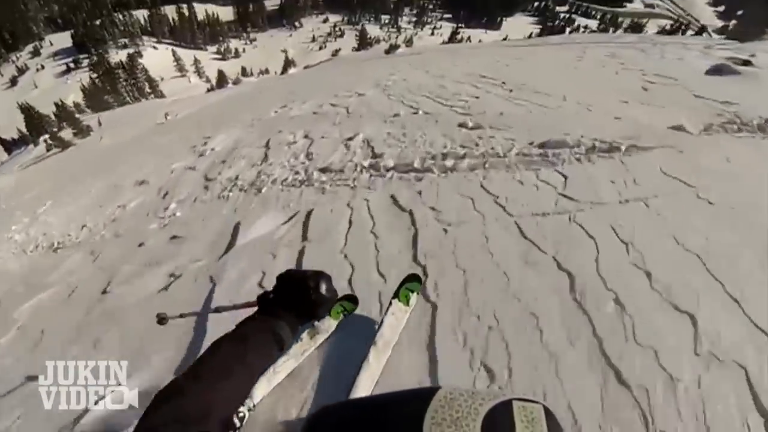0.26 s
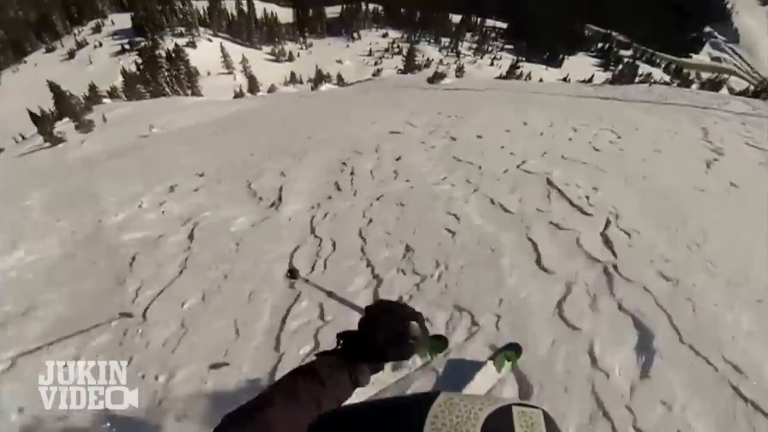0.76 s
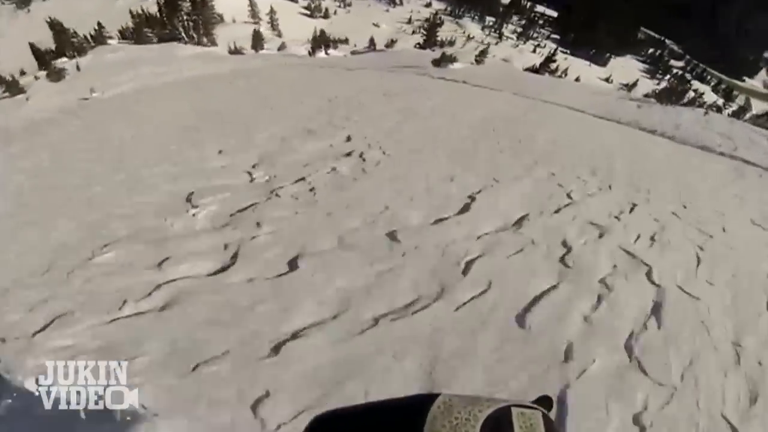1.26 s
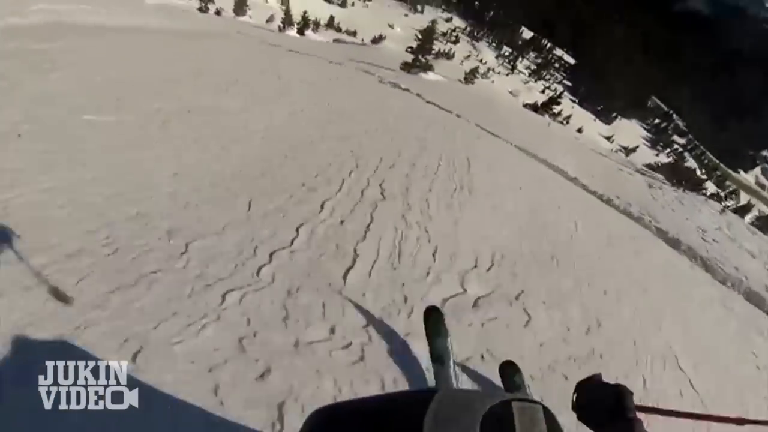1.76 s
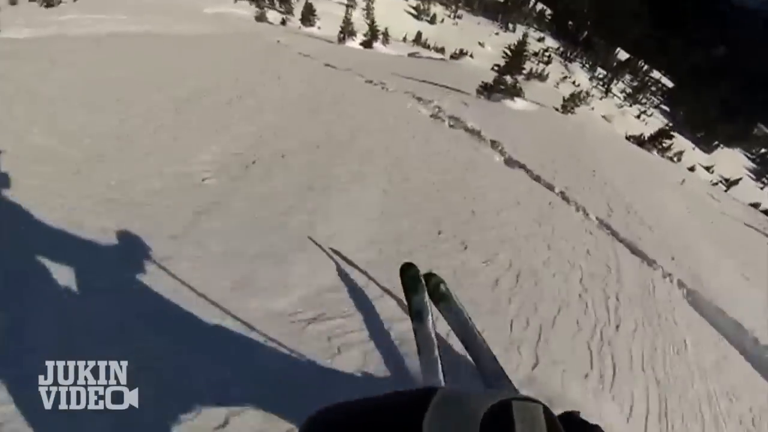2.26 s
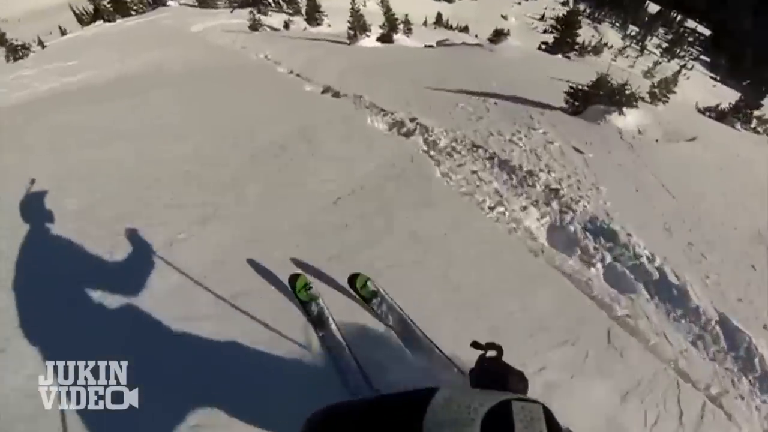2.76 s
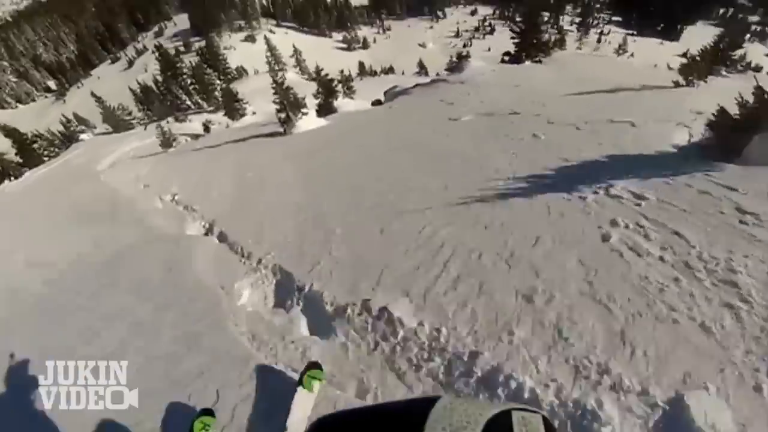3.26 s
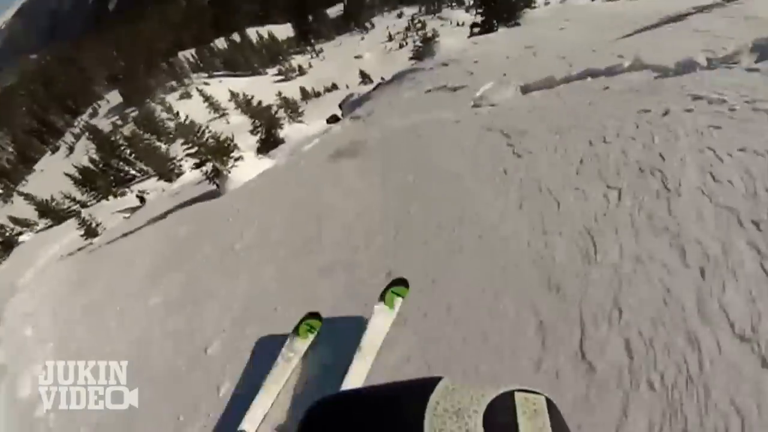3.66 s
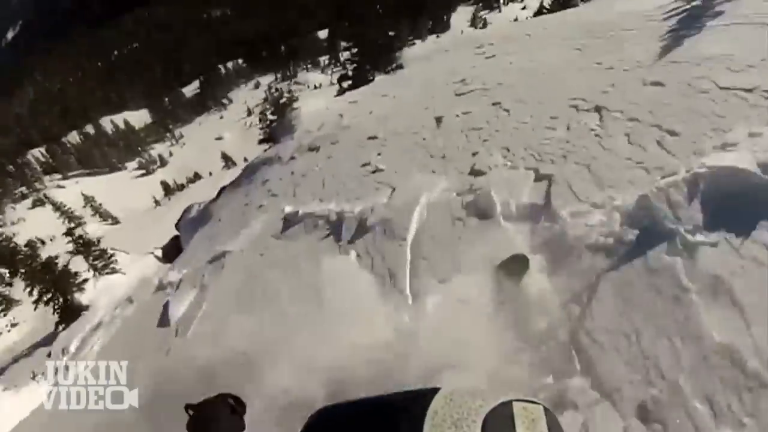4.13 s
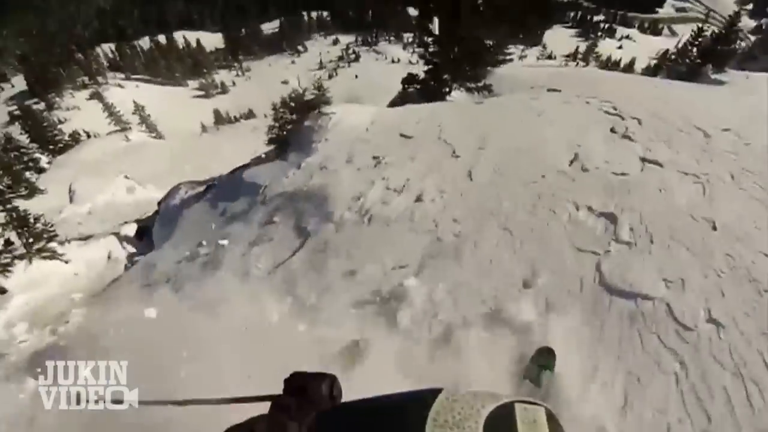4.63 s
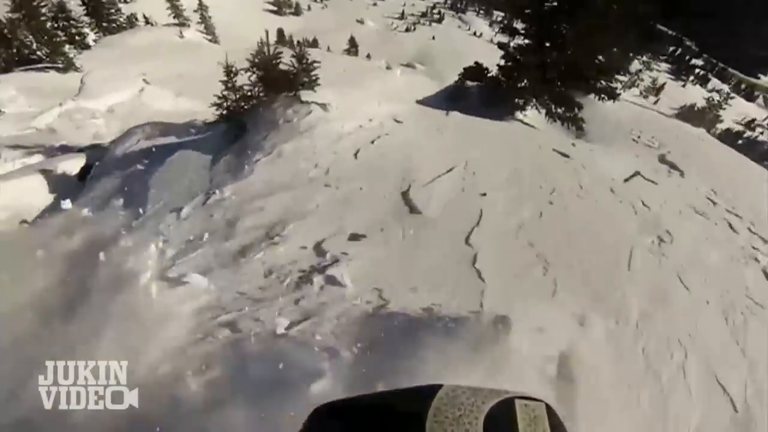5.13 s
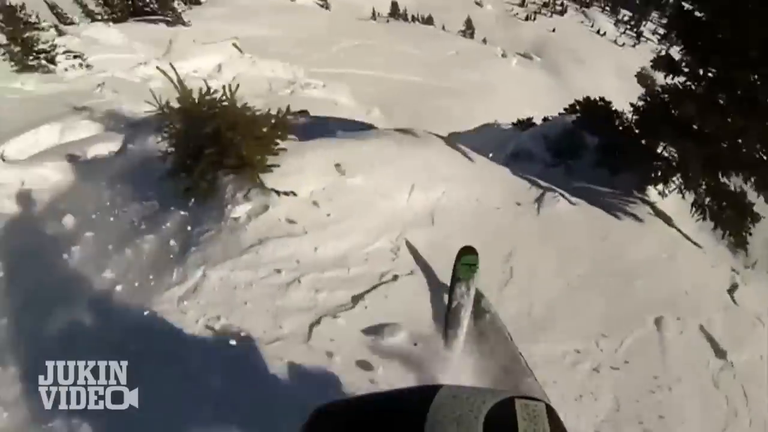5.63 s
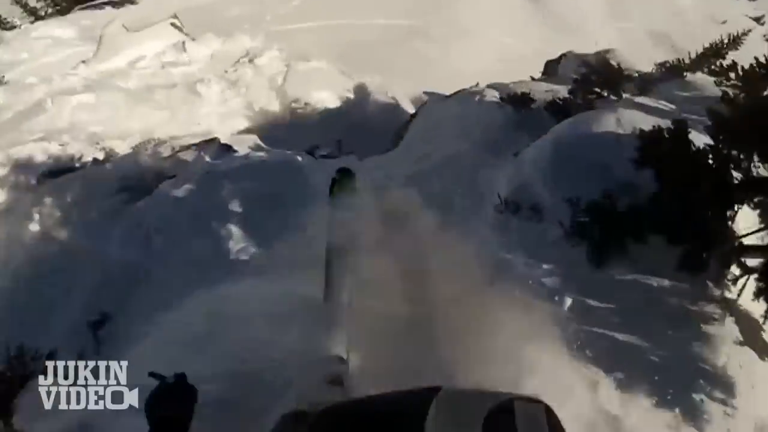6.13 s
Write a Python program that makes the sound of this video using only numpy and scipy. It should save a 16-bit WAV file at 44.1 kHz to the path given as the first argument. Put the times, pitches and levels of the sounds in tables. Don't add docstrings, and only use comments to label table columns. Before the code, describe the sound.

From 0 to 0.9 s, deep fluttering wind rumble and a muffled, grainy ski hiss fill a closed plastic helmet-camera case on an open slope. A soft jolt at 0.9 s leads into a lighter, quieter glide. At 2.2 s a bump and small dry knock briefly dip the level; then the rumble sinks into a lull from about 2.7 s. At 3.35 s the slab gives way: huge low thumps and case slaps, heaviest around 3.45 and 3.6 s, overload the microphone, with tiny ticks and pumping level. Lumps knock the shell, a hard double clack at 3.86 s and the sharpest crack at 4.34 s. From 4.5 s the hiss is thin and the rumble softer. A brittle rattle comes at 4.95 s, a duller, crumbling one at 5.6 s, with bumps near 5.75 and 6.0 s, then faint rumble until 6.4 s.

```python
import sys
import numpy as np
from scipy import signal
from scipy.io import wavfile
from scipy.ndimage import uniform_filter1d

SR = 44100
rng = np.random.default_rng(int(sys.argv[2]) if len(sys.argv) > 2 else 0)


def materialize(psi):
    bounded = np.clip(np.atleast_2d(psi).T, -1, 1)
    quanta = np.round(bounded * 32767).astype(np.int16)
    wavfile.write(sys.argv[1], SR, quanta)


def invert_db(level):
    return 10 ** (np.asarray(level, dtype=float) / 20)


N = 281799

# (time [s], level [dB])
SHAKE = [
    (0.0, 0.5),
    (0.9, -6.5),
    (2.0, -1),
    (2.7, -8.5),
    (3.3, -0.5),
    (3.6, 8),
    (4.3, 1.5),
    (4.5, -5),
    (5.5, -12),
    (6.39, -14.5),
]
FULL_SWING = [0, .937, 2.21, 3.354, 3.454, 3.603, 3.746, 3.80, 3.935, 4.13, 4.258, 4.318, 4.41, 4.972, 5.52,
              5.64, 5.715, 5.765, 6.012, 6.056, 6.39]
# (time [s], level [dB], dying time [s])
GUSTS = [(0.09, -12, 0.034), (0.311, -14, 0.061), (.66, -16.5, 0.12), (.84, -16, 0.29), (1.2, -24, 0.07),
         (1.503, -18.5, 0.77), (1.93, -12.5, 0.025), (2.26, -14.5, 0.14), (2.519, -16, 0.14),
         (2.8, -17, 0.27), (3.1, -26, 0.36), (3.349, -14.5, 0.031), (3.463, 0.5, 0.083), (3.62, -3, 0.17),
         (3.77, -12, 0.032), (3.97, -10.5, 0.15), (4.2, -9.5, 0.21), (4.399, -8, 0.14), (4.57, -37, 0.051),
         (4.808, -22.5, 0.14), (4.977, -15.5, 0.015), (5.101, -18, 0.14), (5.354, -21, 0.21),
         (5.525, -16, 0.039), (5.683, -10.5, 0.12), (5.77, -28, 0.15), (6.049, -15.5, 0.12),
         (6.38, -16, 0.026)]
# (time [s], level [dB], dying time [s])
EDDIES = [(.0, -29.5, 0.031), (0.111, -19.5, 0.013), (.3, -25.5, 0.11), (.44, -30, 0.025), (.56, -29, 0.25),
          (.9, -33, 0.35), (1.29, -36.5, 0.083), (1.49, -38, 0.33), (1.74, -28.5, 0.22), (2.06, -36, 0.031),
          (2.21, -25, 0.053), (2.49, -31.5, 0.093), (2.78, -37.5, 0.083), (3.45, -25, 0.026),
          (3.53, -20.5, 0.1), (3.6, -19.5, 0.13), (3.73, -23.5, 0.023), (3.88, -37, 0.072),
          (4.112, -24, 0.034), (4.34, -16, 0.034), (5.299, -39, 0.088), (5.48, -40.5, 0.029),
          (5.77, -29, 0.085), (5.93, -42, 0.087), (6.18, -39, 0.031), (6.32, -36, 0.049)]
# (frequency [Hz], density [dB per Hz])
BUFFET = [(7, -19), (12, -7), (30, -37.5), (40, -6.5), (50, -12.5), (75, -19), (110, -20.5), (190, -51)]
# (time [s], hiss level [dB])
GLIDE = [(0.0, -36.5), (0.3, -34), (0.9, -37.5), (1.02, -40.5), (1.3, -43), (1.89, -38.5), (2.19, -42.5),
         (2.45, -43.5), (2.87, -41), (3.2, -45.5), (3.42, -39.5), (3.83, -42.5), (4.18, -42), (4.32, -53.5),
         (4.73, -50.5), (5.36, -58), (5.7, -55.5), (6.39, -51)]
# (frequency [Hz], density [dB per Hz])
HISS = [(190, -26), (240, -45), (360, -5), (620, 9.5), (870, -15), (1130, 9), (1450, 9), (2200, 12.5),
        (2750, 0.5), (3600, -5), (5000, -9), (7500, -19.5), (11000, -29.5), (15600, -83)]
# (frequency [Hz], width [Hz], level re hiss [dB])
CASE_PEAKS = [(282, 30, -4), (446, 24, -11), (691, 26, -15), (830, 150, -10), (1390, 170, -1),
              (3250, 120, -18), (4320, 90, -20)]
# (time [s], level [dB], length [ms], direction [sign])
SLAPS = [(2.2, -33, 4.9, -1), (3.4, -13, 37, -1), (3.4393, -10, 3.2, 1), (3.447, 8, 23, 1),
         (3.583, -25, 7.3, -1), (3.7291, -11, 4.7, 1), (3.744, -11, 5.1, 1), (4.109, -24, 4, -1),
         (5.724, -23, 4.8, 1), (5.747, -24, 5.6, -1), (5.995, -31, 6, -1)]
# (time [s], push [dB], rise [ms], hum kick [dB], buffeting [dB])
JOLTS = [(0.929, -10.5, 18, -51, -18), (2.202, -11, 3.4, -33.5, -41), (3.343, -15, 39, -30, -22),
         (3.4438, -8.5, 5.8, -37, -37), (3.588, -1, 11, -13, -5), (3.738, -18, 14, -54, -14.5),
         (3.786, -9, 33, -52, -51), (3.8677, -25, 2.7, -13.5, -21), (4.109, -39, 6.8, -25.5, -24),
         (4.3442, -7, 3, -9, -20), (4.954, -23.5, 14, -36.5, -50), (5.623, -10, 35, -54.5, -34),
         (5.747, -15.5, 15, -19, -19.5), (5.997, -19, 6.6, -26.5, -43), (6.042, -8.5, 22, -41, -22)]
# (time [s], peak [dB], rattle [ms], contact sharpness [Hz], body [dB per octave down])
KNOCKS = [(2.201, -26, 6.9, 4200, -8), (3.440, -30, 3.4, 2550, 14), (3.584, -27, 6.6, 1970, 0),
          (3.731, -24.5, 6.2, 1810, 5), (3.8625, -5, 3.7, 2860, 8.5), (4.113, -31, 4.5, 3000, 6.5),
          (4.296, -32.5, 7.8, 1430, 9), (4.313, -19.5, 5.4, 2450, -22), (4.3359, 9, 0.77, 8060, -7),
          (4.578, -30, 4.9, 3040, -7), (4.682, -37.5, 2, 2500, -4), (4.9493, -17.5, 6.3, 4300, 1),
          (5.6, -16, 16, 3200, -45), (5.746, -42.5, 2.3, 3100, 10), (5.847, -24.5, 4.1, 2890, -8),
          (6.386, -51, 3.7, 8900, 1)]
# (near 0.8 kHz [dB], 1.3 kHz [dB], 1.8 and 2.3 kHz [dB],
# near 3 kHz [dB], above 4 kHz [dB])
SPOTS = [(-2, -10, -14, -1, 5), (7, .1, 7, 7, 6), (-1, 3, 5, .1, .1), (1, -2, 3, 3, -2),
         (9.5, -4, 16.5, 5, 9.5), (-3, -5, -4, 4, 16), (6.5, 1, -1, -12, -5.5), (-4.5, 17.5, 2, -7, 6.5),
         (-2.5, 10.5, -22.5, 4.5, -11.5), (-3, -5, -12, -2, 3), (-8, 3, 10, -11, 6), (-13, 1, 5, -8, -1.5),
         (0, 18.5, 7.5, -18, 3), (14, 10, 2, 12, 3), (-8, 16, 2, -13, 1), (-2, .1, .1, -1, -2)]
# (first contact time [s], delay [ms], level re first contact [dB])
BOUNCES = [(3.8627, .55, 5), (3.8627, 2.2, -4), (3.8627, 5.5, -9), (4.3358, .5, 7), (4.3358, 1.52, 3),
           (4.9495, 1.6, 7), (4.9495, 2.7, 4), (4.9495, 3.9, 6), (4.9495, 5, 4), (4.9495, 7.2, 3),
           (4.9495, 8.4, 3), (4.9495, 10.7, 1), (4.9495, 12.4, 2), (4.9495, 17.5, -4), (5.6, .5, 2),
           (5.6, 1.5, 1), (5.6, 2.5, 3), (5.6, 3.5, 2), (5.6, 5.3, -3), (5.6, 8.2, -1), (5.6, 11.5, -6),
           (5.6, 21.5, -9), (5.6, 29, -10)]
# (frequency [Hz], level [dB], t60 [s])
SHELL = [(287.5, -11, 0.077), (462, -14.5, 0.06), (716, -16.5, 0.059), (810, -12, 0.078), (875, -3, 0.042),
         (1376, -8, 0.022), (1793, 1, 0.012), (1997, 10, 0.0089), (2950, 4.5, 0.0061),
         (3200, -29.5, 0.0067), (4700, -3, 0.0083), (5900, -12, 0.0067), (6980, -13.5, 0.0069),
         (2270, -16.5, 0.039), (2470, -8.5, 0.0088)]
# (frequency [Hz], level [dB], t60 [s])
LATCH = [
    (2420, -32, .17),
    (3200, -47, 0.16),
    (3730, -56, 0.16),
    (1244, -5, 0.016),
]
# (frequency [Hz], width [Hz])
DEAD_SPOTS = [(1050, 240), (3900, 800)]
# (from [Hz], to [Hz])
OPPOSED_HZ = (2600, 4000)
# (time [s], depth [dB])
DUCKS = [(.940, 7), (2.210, 8.5), (3.358, 3), (3.446, 22), (3.605, 12), (3.748, 7), (3.866, 4),
         (4.128, 7.5), (4.3145, 4), (4.337, 12), (5.640, 6), (5.764, 8), (6.055, 5)]
# (from [s], to [s])
BUSY = [
    (.92, 1.04),
    (2.2, 2.36),
    (3.35, 4.62),
    (5.635, 5.85),
    (6.03, 6.17),
]
# (time [s], peak [dB])
TICKS = [(3.3536, -37.5), (3.434, -46), (3.4437, -31), (3.4495, -42), (3.508, -48), (3.6037, -36),
         (3.6562, -42), (3.7217, -36), (3.7457, -37), (3.7978, -45), (3.8444, -45), (4.0258, -38),
         (4.2078, -40), (4.2553, -45), (4.2743, -37.5), (4.3165, -34), (4.3, -44), (4.308, -45),
         (4.353, -51.5), (4.365, -54), (4.396, -50), (4.4408, -55), (4.456, -48), (4.54, -43), (5.657, -47),
         (5.665, -41), (5.699, -48), (5.7489, -37.5), (6.074, -40), (6.0804, -65), (6.1, -48)]

MOUNT_HZ = 19
HUM_HZ, HUM_WIDTH_HZ = 148.5, 6


def rms_one(x):
    return x / np.sqrt(np.mean(x ** 2) + 1e-20)


def in_time(rows):
    s, *columns = np.transpose(rows)
    return [np.interp(np.arange(N) / SR, s, c) for c in columns]


def drift(rate):
    r = np.exp(-80 * np.pi * rate / SR)
    slow = signal.lfilter([1], [1, -2 * r, r * r], rng.standard_normal(N // 40 + 2002))[2000:]
    return np.interp(np.arange(N) / 40, np.arange(len(slow)), rms_one(slow))


def low_pass(x, hz):
    return signal.sosfilt(signal.butter(4, hz, fs=SR, output="sos"), x)


def evened(x, hz):
    envelope = np.sqrt(uniform_filter1d(x ** 2, int(2 * SR / hz)))
    return rms_one(x / (.2 + envelope))


def ring(clicks, hz, t60):
    r, w = invert_db(-60 / (t60 * SR)), 2 * np.pi * hz / SR
    return signal.lfilter([0, np.sin(w)], [1, -2 * r * np.cos(w), r * r], clicks + 1e-18)


def resonant_noise(hz, width_hz):
    r, w = np.exp(-np.pi * width_hz / SR), 2 * np.pi * hz / SR
    noise = signal.lfilter([1, 0, -1], [1, -2 * r * np.cos(w), r * r], rng.standard_normal(N + SR))
    return rms_one(noise[SR:])


def bands(spectrum, flicker_db, rate):
    hz, level_db = np.transpose(spectrum)
    edges = np.geomspace(hz[0], hz[-1], int(3 * np.log2(hz[-1] / hz[0])) + 1)
    white, together = rng.standard_normal((2, N)), drift(rate)
    out = []
    for k, (low, high) in enumerate(zip(edges, edges[1:])):
        centre_db = np.interp(np.log(low * high) / 2, np.log(hz), level_db)
        band_filter = signal.butter(2, [low, high], "band", fs=SR, output="sos")
        band = signal.sosfilt(band_filter, white[k % 2])
        flicker = flicker_db * (.7 * together + .7 * drift(rate))
        out.append(band * invert_db(centre_db + flicker))
    return np.sqrt(edges[1:] * edges[:-1]), np.array(out) / np.std(np.sum(out, axis=0))


def swells(between_db, rows, rise_share):
    s, level_db, fall_s = np.transpose(rows)[:, :, None]
    late = (np.arange(0, N + 64, 64) / SR - s) / np.maximum(fall_s, .005)
    shape = np.exp(np.where(late > 0, -late, late / rise_share))
    power = np.sum((invert_db(level_db) * shape) ** 2, axis=0)
    swell_power = np.interp(np.arange(N) / 64, np.arange(len(power)), power)
    return np.sqrt(invert_db(between_db) ** 2 + swell_power)


def rocking():
    t, peaks = np.arange(N) / SR, np.array(FULL_SWING)
    gaps = np.diff(peaks)
    cycles = np.cumsum(np.r_[0, np.maximum(np.round(gaps * MOUNT_HZ), 1)])
    knots = np.sort(np.r_[peaks, (peaks[1:] + peaks[:-1]) / 2])
    free = np.interp(t, knots, np.r_[np.c_[0 * gaps, gaps].ravel(), 0])
    wander = 0.27 * drift(2.82) * np.minimum(free / 0.25, 1)
    return np.sqrt(2) * np.cos(2 * np.pi * (np.interp(t, peaks, cycles) + wander))


def wind():
    rock_db, buffet_db, hum_db = -24.5, -38.5, -37.5
    burst_rise_s, burst_fall_s = 0.032, 0.009
    shake_db, = in_time(SHAKE)
    bursts = [(s + 0.017, burst_db, burst_fall_s) for s, *_, burst_db in JOLTS]
    hz, gusts = bands(BUFFET, flicker_db=7.0, rate=9.9)

    slow = 0.72 * rocking() + invert_db(-3.5) * rms_one(gusts[hz < 35].sum(axis=0))
    fast = evened(rms_one(low_pass(gusts[hz > 35].sum(axis=0), 200)), 20)
    hum = evened(resonant_noise(HUM_HZ, HUM_WIDTH_HZ), HUM_HZ / 4)
    hum = low_pass(hum, 185) * invert_db(2.5 * drift(5))

    rock_gain = swells(rock_db + shake_db, GUSTS, rise_share=0.35)
    hum_gain = swells(hum_db + shake_db, EDDIES, rise_share=0.49)
    buffet_gain = swells(buffet_db + shake_db + 2.0 * drift(13.0), bursts, burst_rise_s / burst_fall_s)
    return rock_gain * slow + hum_gain * hum + buffet_gain * fast


def skis():
    hz, noise = bands(HISS, flicker_db=1.1, rate=4.2)
    peaks = [invert_db(level_db) * resonant_noise(peak_hz, width) for peak_hz, width, level_db in CASE_PEAKS]
    dull = low_pass(noise[hz < 1100].sum(axis=0) + sum(peaks[:4]), 1300)
    middle = low_pass(noise[(hz > 1100) & (hz < 2700)].sum(axis=0) + peaks[4], 2550)
    bright = sum(low_pass(band, min(1.5 * f, 18000)) for f, band in zip(hz, noise) if f > 2700)
    bright = bright + low_pass(sum(peaks[5:]), 5500)
    crunch = invert_db(1.1 * drift(110))

    (hiss_db,), (shake_db,) = in_time(GLIDE), in_time(SHAKE)
    load_db = hiss_db + 43
    dull_db = -48.5 + 0.8 * load_db + 0.032 * shake_db
    bright_db = -54.5 + 1.104 * load_db + 0.24 * shake_db
    parts = (hiss_db, middle), (dull_db, dull), (bright_db, bright)
    return crunch * sum(invert_db(db) * rms_one(part) for db, part in parts)


def slaps():
    out = np.zeros(N)
    for s, level_db, length_ms, direction in SLAPS:
        push = np.hanning(max(round(length_ms * SR / 1000), 20))
        i = round(s * SR)
        out[i:i + len(push)] += np.sign(direction) * invert_db(level_db) * push
    return out


def jolts():
    out, t = np.zeros(N), np.arange(SR // 2) / SR
    hum = np.sin(2 * np.pi * HUM_HZ * t) * np.exp(-t / 0.058)
    for s, push_db, rise_ms, kick_db, _ in JOLTS:
        rise = np.clip(rise_ms / 1000, .001, .03)
        back = np.maximum(t - rise, 0)
        outward = np.sin(np.pi / 2 * np.minimum(t / rise, 1)) ** 2
        swing = outward * np.cos(2 * np.pi * MOUNT_HZ * back) * np.exp(-back / .02)
        i = round(s * SR)
        out[i:i + len(t)] += (invert_db(push_db) * swing + invert_db(kick_db) * hum)[:N - i]
    return out


def lump_contacts(s, rattle_ms, sharp_hz, length):
    crumbs_db, soft_after_ms, soft_hz = -7, 5, 1800
    fade = np.exp(-np.arange(length) / SR * 1000 / max(rattle_ms, .3))
    contacts = fade * rng.standard_normal(length) * (rng.random(length) < 3000 / SR)
    bounces = [(round(ms * SR / 1000), db) for first, ms, db in BOUNCES if abs(first - s) < .004]
    if bounces:
        contacts *= invert_db(crumbs_db)
    contacts[0] = -1
    soft = np.zeros(length)
    for late, bounce_db in bounces:
        target = soft if late > soft_after_ms * SR / 1000 else contacts
        target[late] = -invert_db(bounce_db)
    contacts += signal.lfilter(*signal.butter(2, soft_hz, fs=SR), soft)
    return signal.lfilter(*signal.butter(2, sharp_hz, fs=SR), contacts)


def knocks():
    body = np.array(SHELL + LATCH)
    mode_hz, mode_db = body[:, 0], body[:, 1]
    out, length, low = np.zeros(N), SR // 5, mode_hz < 1100
    octaves_down = np.log2(1400 / mode_hz) * low
    latch = np.arange(len(body)) >= len(SHELL)
    panel = np.digitize(mode_hz, [600, 1100, 1500, 1850, 2100, 2500, 4000]) * ~latch
    opposed = (mode_hz > OPPOSED_HZ[0]) & (mode_hz < OPPOSED_HZ[1])
    for (s, peak_db, rattle_ms, sharp_hz, body_db), spot in zip(KNOCKS, SPOTS):
        base_db, low_db, side_db, upper_db, top_db = spot
        contacts = lump_contacts(s, rattle_ms, sharp_hz, length)
        spot_db = np.array([0, base_db, low_db, side_db, 0, side_db, upper_db, top_db])[panel]
        chance_db = rng.normal(0, 1.5, len(body))
        gains = invert_db(mode_db + chance_db + body_db * octaves_down + peak_db * latch + spot_db)
        gains[opposed] *= -1
        modes = np.array([g * ring(contacts, hz, t60) for (hz, _, t60), g in zip(body, gains)])
        modes[~low] = signal.lfilter(*signal.butter(2, 1000, "high", fs=SR), modes[~low])
        for dead_hz, width_hz in DEAD_SPOTS:
            notch = signal.iirnotch(dead_hz, dead_hz / width_hz, fs=SR)
            modes[~latch] = signal.lfilter(*notch, modes[~latch])
        panel_peak = np.abs(modes[~low].sum(axis=0)).max()
        i = round(s * SR)
        out[i:i + length] += invert_db(peak_db) * modes.sum(axis=0)[:N - i] / panel_peak
    return out


def gain_control():
    attack_ms, release_db_per_s, step_db = 7, 55, .35
    updates_per_s, creep_updates_per_s = 4500, 700
    right_lead_ms, deep_mismatch_db, hunt_db = -.6, 1, .22
    t, gains = np.arange(N) / SR, []
    busy = sum((t > a) & (t < b) for a, b in BUSY)
    updates, shared = rng.random((2, N)), .3 * drift(7)
    for side in (0, 1):
        down_db = np.zeros(N)
        for s, drop_db in DUCKS:
            late = t - s + side * right_lead_ms / 1000
            depth_db = drop_db + side * deep_mismatch_db * (drop_db / 19) ** 4
            attack = np.clip(late * 1000 / attack_ms, 0, 1)
            down_db = np.maximum(down_db, attack * (depth_db - release_db_per_s * late))
        rate = np.where(np.gradient(down_db) > 0, updates_per_s, creep_updates_per_s)
        down_db += busy * (shared + hunt_db * drift(25))
        held = np.maximum.accumulate(np.arange(N) * (updates[side] < rate / SR))
        gains.append(invert_db(-step_db * np.round(down_db[held] / step_db)))
    return uniform_filter1d(np.array(gains), size=2)


def ticks():
    tick_db, tick_hz = 9, 1470
    s, peak_db = np.transpose(TICKS)
    edges, left = np.zeros((2, N)), rng.choice([.4, 1.6], len(s))
    signs = rng.choice([-1, 1], len(s))
    edges[:, (s * SR).astype(int)] = invert_db(peak_db + tick_db) * signs * [left, 2 - left]
    return signal.lfilter([1], [1, -np.exp(-2 * np.pi * tick_hz / SR)], edges + 1e-18)


def scene():
    return np.tile(wind() + skis() + slaps() + jolts() + knocks(), (2, 1))


def band_limit(x):
    return signal.sosfilt(signal.butter(12, 15800, fs=SR, output="sos"), x)


def record(dry):
    self_noise_db, preamp_db, converter_db = -69.5, -72, -79
    white = rng.standard_normal((3,) + dry.shape)
    capsule, preamp, converter = signal.lfilter([1], [1, -.3], white)
    hiss_band = signal.butter(1, [4000, 10500], "band", fs=SR)
    preamp, converter = signal.lfilter(*hiss_band, [preamp, converter])
    hiss = invert_db(self_noise_db) * (capsule[0] + invert_db(-13) * resonant_noise(11000, 900))
    hiss = hiss + invert_db(preamp_db) * preamp
    mix = .93 * np.tanh(1.07 * (dry + hiss) * gain_control() + ticks()) + invert_db(converter_db) * converter
    mix = signal.sosfilt(signal.cheby2(10, 40, 15800, fs=SR, output="sos"), mix)
    return band_limit(mix)


dry = scene()
out = record(dry)
materialize(out)
```